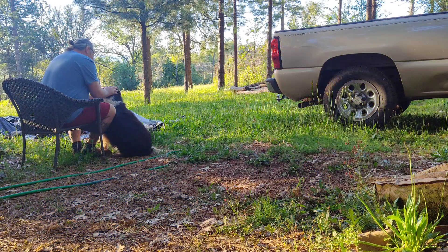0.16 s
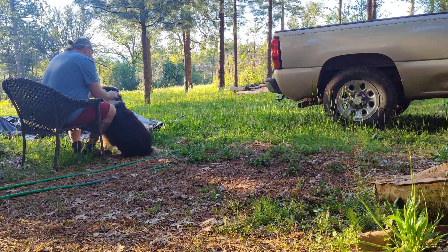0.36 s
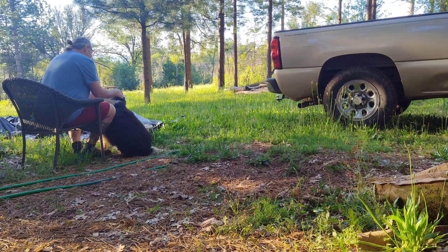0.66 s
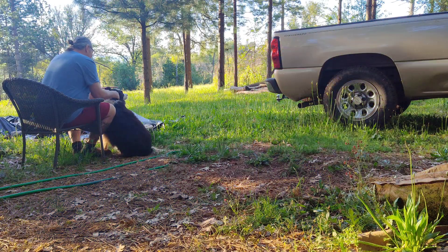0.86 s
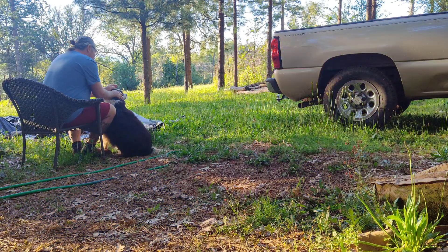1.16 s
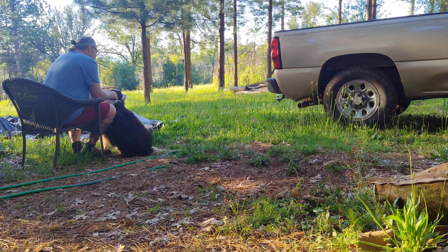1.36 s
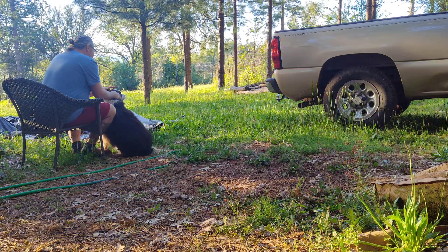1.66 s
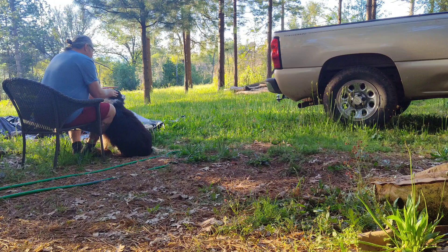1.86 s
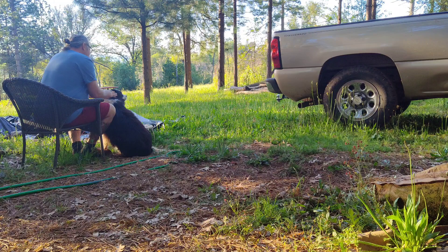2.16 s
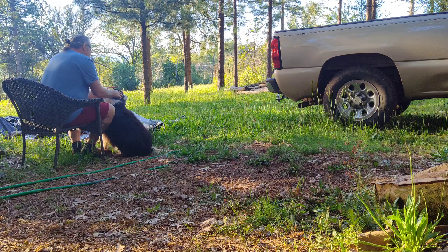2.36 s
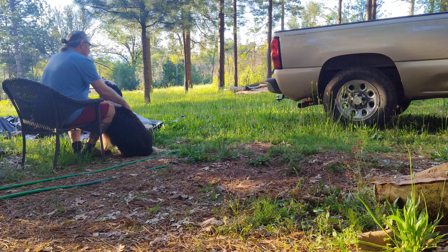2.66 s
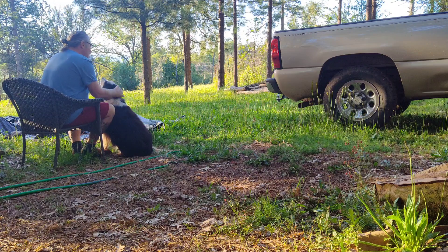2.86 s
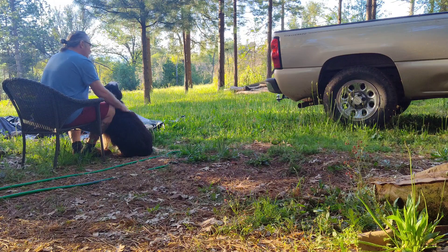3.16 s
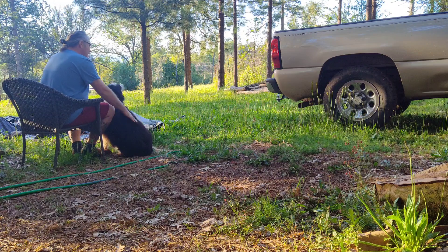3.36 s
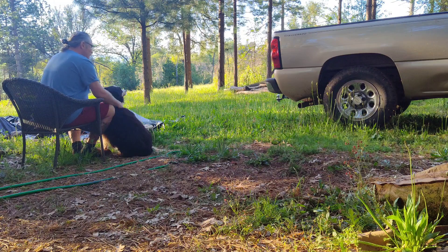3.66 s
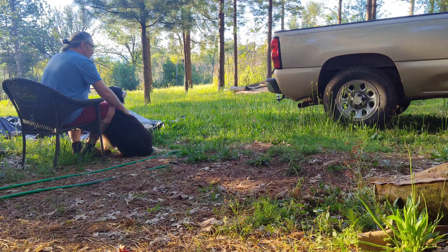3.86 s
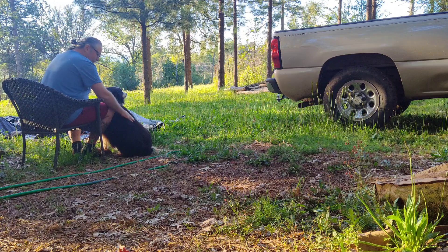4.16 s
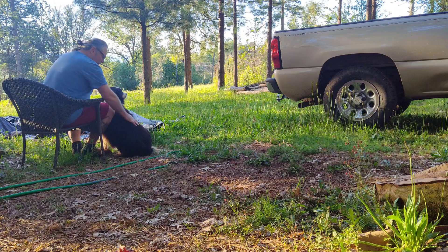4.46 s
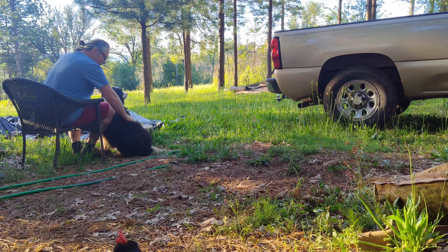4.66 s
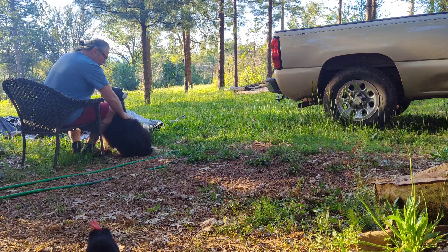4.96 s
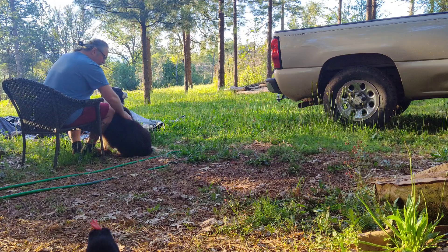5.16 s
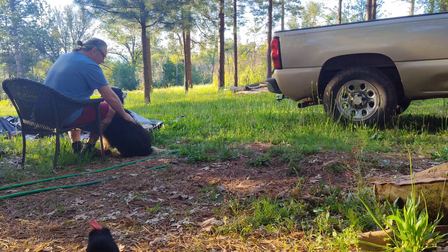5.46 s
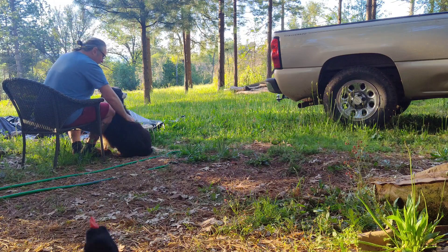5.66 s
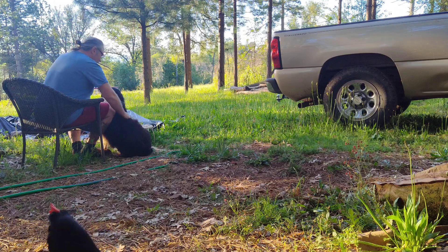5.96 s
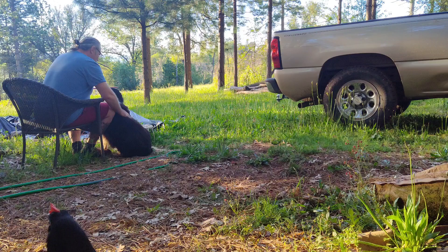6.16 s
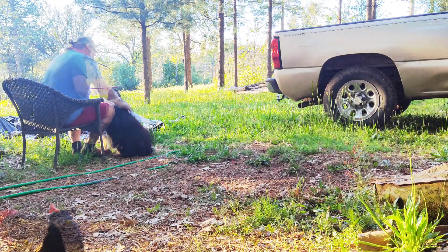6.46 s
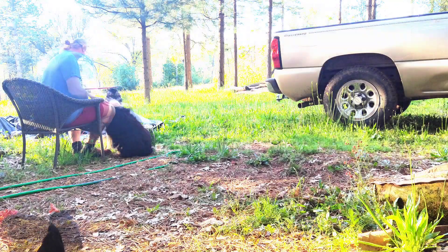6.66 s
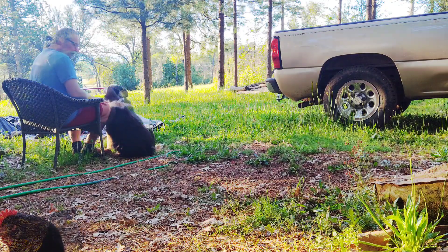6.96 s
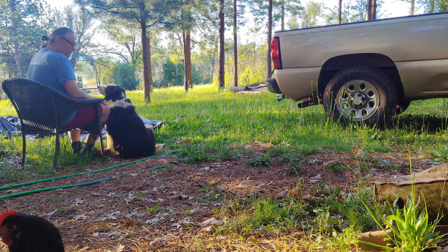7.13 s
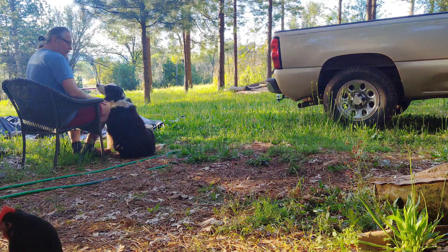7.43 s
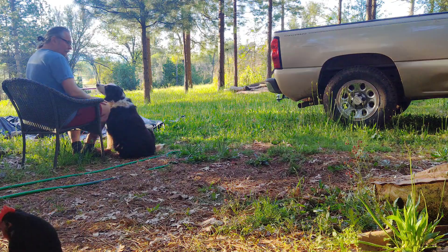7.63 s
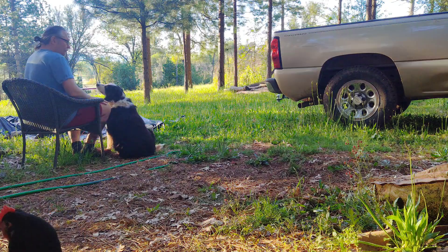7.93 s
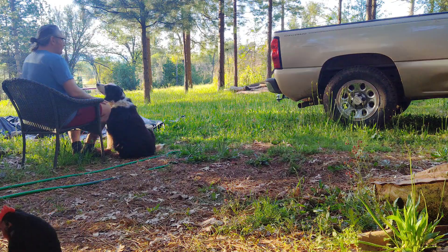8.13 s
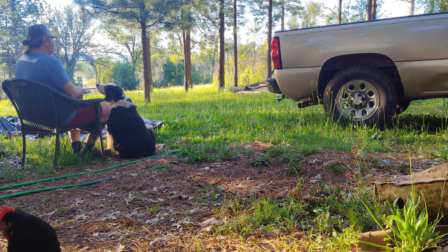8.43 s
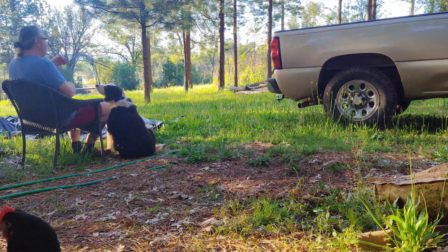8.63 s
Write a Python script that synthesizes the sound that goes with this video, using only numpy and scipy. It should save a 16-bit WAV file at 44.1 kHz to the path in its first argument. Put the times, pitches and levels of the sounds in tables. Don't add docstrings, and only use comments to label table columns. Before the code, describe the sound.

A hen close by clucks softly, then gives one long caw that turns hoarse and stops short, amid wind, leaves and distant birds.

```python
import sys
import numpy as np
from scipy import signal
from scipy.fft import rfft, irfft
from scipy.io import wavfile
from scipy.ndimage import uniform_filter1d

SR = 44100
rng = np.random.default_rng(int(sys.argv[2]) if len(sys.argv) > 2 else 0)


def store_wav(level_fs):
    pcm = np.round(np.clip(np.atleast_2d(level_fs), -1, 1) * 32767)
    wavfile.write(sys.argv[1], SR, pcm.T.astype(np.int16))


def rack_gain(trim_db):
    fader = np.asarray(trim_db, float)
    return 10 ** (fader / 20)


N = 387638


def evened(x):
    return x / np.sqrt(np.mean(x ** 2) + 1e-20)


def smooth_twice(x, span):
    return uniform_filter1d(uniform_filter1d(x, span), span)


def slow(count, span):
    return evened(smooth_twice(rng.standard_normal(count), span))


def hump(t, middle_s, length_s):
    return np.clip(1.5 - 2 * abs(t - middle_s) / length_s, 0, 1)


def read(points, hz):
    f, value = np.transpose(points)
    return np.interp(np.log(hz + 1), np.log(f + 1), value)


def add(mix, s, sound):
    part = mix[..., round(s * SR):][..., :sound.shape[-1]]
    part += sound[..., :part.shape[-1]]


def sides(pan_db):
    gains = rack_gain(np.array([[pan_db / 2], [-pan_db / 2]]))
    return gains / gains.mean()


def trees(x, t60_s, rise_s):
    t = np.arange(SR) / SR
    taps = rng.choice([-1., 1.], (2, SR)) * (rng.random((2, SR)) < .06)
    taps *= (1 - np.exp(-t / rise_s)) * rack_gain(-60 * t / t60_s)
    return signal.fftconvolve(x, taps / np.linalg.norm(taps[0]), axes=1)[:, :N]


# f/Hz, level/dB per Hz
AIR_SPECTRUM = [(20, 7.5), (45, -6.5), (120, -10.5), (220, -16), (600, -24.5), (3500, -29.5), (7000, -29),
                (9500, -34.5)]
# f/Hz, share [0-1]
RUSTLE_BAND = [(100, 0.44), (600, 0.62), (3000, 1.), (12000, 0.78)]
# f/Hz, share [0-1]
CHORUS_BAND = [(3400, 0.031), (4400, 0.94), (7000, 0.73), (8500, 0.1)]
# t/s, width/s, level/dB
CHORUS_SWELLS = [(.05, 0.12, 2), (.85, 0.19, 5), (1.5, 0.99, 4.5), (2.15, 0.35, 1.5), (3.9, .7, 4.5),
                 (5.75, 0.41, 5), (6.4, 0.11, 3)]
# f/Hz, correlation [-1 to 1]
LIKENESS = [(60, 0.51), (180, 0.38), (550, 0.27), (1650, -0.23), (4970, 0.15), (15000, -0.065)]
# f/Hz, L-R/dB
BALANCE = [(60, -3), (180, -0.8), (550, -1.8), (1650, 0.5), (4970, -1), (15000, -3)]


def air():
    frames, hz = N // 256 + 5, np.fft.rfftfreq(1024, 1 / SR)
    t = np.arange(frames) * 256 / SR
    a, b, c, d, patches = rng.standard_normal((frames, 513, 5)).T
    patches = evened(uniform_filter1d(uniform_filter1d(patches, 12, 0), 10, 1))

    gust_rise, gust_fall = (t - 6.17) / 0.075, (7.25 - t) / 0.22
    rustle_db = 5 * np.clip(np.minimum(gust_rise, gust_fall), 0, 1) + .5 * slow(frames, 8)
    chorus_db = 2 + sum(db * np.exp(-((t - s) / width_s) ** 2) for s, width_s, db in CHORUS_SWELLS)
    chorus = read(CHORUS_BAND, hz)[:, None]
    field_db = read(AIR_SPECTRUM, hz)[:, None] + read(RUSTLE_BAND, hz)[:, None] * rustle_db
    field_db += chorus * chorus_db + (1.24 + 1.3 * chorus) * patches
    field_db += 1.22 / (1 + (hz[:, None] / 120) ** 2) * slow(frames, 20)

    same = np.clip(read(LIKENESS, hz), -1, 1)[:, None]
    lean = rack_gain(read(BALANCE, hz) / 2)[:, None]
    left = a + 1j * b
    other = same * left + np.sqrt(1 - same ** 2) * (c + 1j * d)
    z = np.array([left * lean, other / lean]) * rack_gain(field_db)
    return rack_gain(-59.5) * evened(signal.istft(z, nperseg=1024, noverlap=768)[1][:, :N])


# f/Hz, level/dB per Hz
SNAP_SPECTRUM = [(590, -54), (1000, -32), (3600, -27), (4510, -12), (6410, -9), (10600, -33), (12700, -31),
                 (15000, -84)]
# t/s, peak level/dB, L-R/dB
SNAPS = [
    (0.788, -45.5, 0),
    (0.827, -42, 0),
    (1.483, -53, -14),
]


def twigs():
    out, t = np.zeros((2, N)), np.arange(600) / SR
    for s, db, pan_db in SNAPS:
        spectrum = rfft(rng.standard_normal((2, 600)))
        burst = irfft(spectrum * rack_gain(read(SNAP_SPECTRUM, np.fft.rfftfreq(600, 1 / SR))))
        add(out, s, sides(pan_db) * rack_gain(db - 1.0) * evened(burst) * rack_gain(-60 * t / 0.02))
    return out


def whistle(db, from_hz, to_hz, length_s, pan_db, bend=1.6, swell=0, grain_db=0):
    u = np.linspace(0, 1, int(length_s * SR))
    hz = to_hz + (from_hz - to_hz) * (1 - u) ** bend
    hz = hz * (1 + 0.0041 * grain_db * slow(len(u), 90))
    shape = np.sin(np.pi * u) ** 0.19 * u ** swell * rack_gain(db + grain_db * slow(len(u), 100))
    return sides(pan_db) * np.sqrt(2) * np.sin(2 * np.pi * np.cumsum(hz) / SR) * shape


# t/s, level/dB, from f/Hz, to f/Hz, length/s
NOTES_RIGHT = [(1.045, -60, 6900, 5920, 0.018), (2.93, -68, 7200, 5760, 0.015),
               (3.07, -74.5, 5740, 6350, .15), (4.445, -73.5, 2360, 2367, .037),
               (4.85, -70, 7500, 7070, 0.03), (4.885, -77, 7200, 8000, .016), (5.705, -65, 6800, 5540, 0.02),
               (5.82, -66, 6150, 5140, 0.039), (6.19, -60, 5800, 5970, 0.056), (6.2, -68, 8840, 9150, .026),
               (6.269, -54.5, 7380, 5780, 0.017), (8.48, -73, 7360, 7300, .014),
               (8.7, -68.5, 7360, 6550, .019), (8.76, -67, 7200, 6570, 0.0094)]
# t/s, level/dB, from f/Hz, to f/Hz, length/s
NOTES_AHEAD = [(.2, -78.5, 6360, 3970, 0.26), (.685, -70.5, 5300, 5170, 0.016), (1.28, -76, 613, 588, 0.17),
               (2.57, -69, 6400, 4660, .035), (2.638, -63, 4700, 5220, 0.014),
               (2.79, -68, 5260, 4920, .016), (2.845, -69, 4900, 5170, 0.021),
               (2.955, -62.5, 5440, 5000, 0.019), (3.03, -72, 5280, 4700, .014),
               (3.13, -66.5, 6780, 4780, .025), (3.165, -71.5, 3644, 3330, 0.026),
               (3.205, -74, 7180, 5020, 0.14), (3.218, -71, 4780, 3050, 0.099),
               (5.729, -68, 5450, 5220, 0.052), (5.78, -67, 3400, 3290, 0.014),
               (6.485, -70.5, 2000, 2110, 0.031)]
# t/s, level/dB, f/Hz, length/s
WHISTLES_LEFT = [(5.386, -72, 4700, 0.038), (5.568, -68, 4790, 0.15), (5.866, -66.5, 4750, 0.12),
                 (5.998, -68.5, 5240, .075), (6.106, -62.5, 4790, 0.11), (6.565, -64.5, 4210, 0.082),
                 (6.676, -69, 3130, 0.036), (7.262, -76, 3040, .038), (7.758, -75.5, 4760, 0.059),
                 (8.199, -80.5, 3610, 0.74)]


def far_notes():
    far = np.zeros((2, N))
    other = [(s, db, hz, 0.97 * hz, length_s) for s, db, hz, length_s in WHISTLES_LEFT]
    for notes, pan_db in (NOTES_RIGHT, -12), (NOTES_AHEAD, 0.5), (other, 14):
        for s, *shape in notes:
            add(far, s, whistle(*shape, pan_db, grain_db=3.5))
    return .7 * far + trees(.62 * far, .28, .006)


# t/s, level/dB
SLASHED_NOTES = [(4.6584, -64), (4.7666, -65.5), (4.9116, -62), (5.03, -57.5), (5.1373, -62), (5.2664, -57),
                 (5.372, -58), (5.4835, -60), (5.5932, -64)]


def slashes():
    out = np.zeros((2, N))
    for s, db in SLASHED_NOTES:
        add(out, s - .008, whistle(db - 7.5, 7900, 5400, 0.025, -21, bend=1.2, grain_db=4.0))
    return out + trees(.45 * out, .28, .006)


def trill():
    out, count, pan_db = np.zeros((2, N)), 13, 1.5
    for k in range(count):
        s = 1.1 + k / 19.85
        hz = 5020 + 108 * np.cos(2 * np.pi * k / 4.4)
        db = -58 - 9 * (k / (count - 1)) ** 8
        note = whistle(db - 3, 1.075 * hz, .945 * hz, 0.014, pan_db, bend=1.18, grain_db=3.0)
        add(out, s - .004, note)
        add(out, s - .014, whistle(db - 12, 6850, 6100, .01, pan_db))
    return out + rack_gain(-4) * trees(out, 0.88, 0.014)


# t/s, level/dB, from f/Hz, to f/Hz, length/s
SHARP_CHIPS = [
    (0.864, -42.5, 8860, 6960, 0.048),
    (2.476, -45, 9110, 7290, 0.014),
    (6.687, -46.5, 8560, 7040, .04),
]


def chips():
    deep = np.zeros((2, N))
    for s, *shape in SHARP_CHIPS:
        add(deep, s, whistle(*shape, -13.5, bend=2.2, swell=.65))
    return rack_gain(2) * (rack_gain(-12.0) * deep + trees(deep, 0.58, 0.013))


HEN_START_S, HEN_END_S = 2.6, 4.4
CLEAR_START_S, CLEAR_END_S = 2.895, 3.395
# top t/s, hold/s, effort level/dB, from f/Hz, to f/Hz
SOFT_CLUCKS = [
    (2.635, .004, -41.5, 588, 540),
    (2.671, 0.0201, -46.5, 591, 557),
    (2.718, .044, -45, 577.4, 513),
    (2.873, .004, -41.5, 725, 590),
    (2.906, 0.0021, -46, 599.5, 903),
]
# t/s, effort level/dB, beat f/Hz, beak opening [up to 1]
LONG_CAW = [
    (2.95, -48.5, 540, -0.58),
    (3.2, -46, 540, 0.019),
    (3.389, -40, 539, 0.31),
    (3.5, -39.5, 525.2, .4),
    (3.6, -38.5, 512, 0.67),
    (3.669, -37, 498, 0.79),
    (3.88, -38, 549, 0.77),
    (4.29, -35, 533, 0.99),
    (4.364, -38, 559.7, 0.87),
]
# t/s, length/s, push level/dB
EVEN_SLIPS = [
    (4.053, .018, -2),
    (4.107, .03, 0.),
    (4.155, .018, -0.5),
    (4.319, .035, 3.5),
]
SECOND_BEAT = [(.6, .86), (.75, .54), (1, .4)]
# t/s, length/s, stumble chance [0-1]
LOST_STEPS = [(2.675, .015, .6), (2.865, .02, .2), (3.41, .018, .6), (3.52, .18, .1), (3.78, .04, .5),
              (3.908, .08, .8), (4.025, .015, .9), (4.085, .015, .6), (4.13, .03, .9), (4.235, .09, .4),
              (4.295, .02, .8), (4.345, .015, .2)]


def gait(t):
    s, _, caw_hz, beak = np.transpose(LONG_CAW)
    glides = []
    for top_s, hold_s, _, from_hz, to_hz in SOFT_CLUCKS:
        glides += [(top_s - .01, from_hz), (top_s + hold_s + .016, to_hz)]
    glides = sorted(glides)
    swoop_hz = 90.07 * np.exp(np.minimum((s[0] - t) / 0.011, 1.2))
    slip = sum(hump(t, at, length_s) for at, length_s, _ in EVEN_SLIPS)
    caw_hz = np.interp(t, s, caw_hz) + swoop_hz - 39.83 * slip
    hz = np.where(t < glides[-1][0], np.interp(t, *np.transpose(glides)), caw_hz)

    cluck_second = np.maximum(.46 - .0025 * np.maximum(hz - 600, 0), .1)
    hoarse_second = np.interp(np.interp(t, s, beak), *np.transpose(SECOND_BEAT))
    hoarse_second = np.maximum(hoarse_second, np.minimum(0.93 * slip, 1))
    second = np.select([t < CLEAR_START_S, t < CLEAR_END_S], [cluck_second, 1], hoarse_second)

    risks = [chance * hump(t, at, length_s) for at, length_s, chance in LOST_STEPS]
    risks.append(.015 * (t > CLEAR_END_S))
    return hz, second, np.max(risks, 0)


def beats(t):
    hz, weak, stumble = gait(t)
    hz = hz * (1 + .022 * slow(len(t), 300))
    train, at = np.zeros(len(t) + 1000), 0.
    for luck, jitter, *wobble in rng.random((700, 5)):
        if at >= len(t):
            break
        step, second, risk = SR / hz[int(at)], weak[int(at)], stumble[int(at)]
        stumbles = luck < risk
        sizes = [1, second, second ** 2] if stumbles else [1, second]
        loose = .075 * (1 - second) + .08 * risk
        step *= 1 + (.01 + loose) * (jitter - .5)
        for size, chance in zip(sizes, wobble):
            whole, part = divmod(at, 1)
            size = size * (1 + 6 * loose * (chance - .5))
            train[int(whole):int(whole) + 2] += size * np.array([1 - part, part])
            at += step * (.92 if stumbles else 1)
        at += .55 * step * stumbles
    return train[:len(t)]


# t/s, level/dB
FALTERS = [
    (2.926, -10),
    (3.052, -6.5),
    (3.241, -6),
    (3.315, -2.5),
    (4.14, -1.5),
    (4.345, -1),
]


def effort(t):
    rise_db_per_s, fall_db_per_s, stop_db_per_s = 1500, 955, 2000
    s, caw_db = np.transpose(LONG_CAW)[:2]
    clucks = 0
    for top_s, hold_s, db, *_ in SOFT_CLUCKS:
        rise_db = rise_db_per_s * np.maximum(top_s - t, 0)
        fall_db = fall_db_per_s * np.maximum(t - top_s - hold_s, 0)
        clucks = clucks + rack_gain(db - rise_db - fall_db)
    db = np.interp(t, s, caw_db) - rise_db_per_s * np.maximum(s[0] - t, 0)
    db = db - stop_db_per_s * np.maximum(t - s[-1], 0)
    db = db + sum(push_db * hump(t, at, length_s) for at, length_s, push_db in EVEN_SLIPS)
    dips_db = sum(dip_db * hump(t, at, 0.0161) for at, dip_db in FALTERS)
    return (clucks + rack_gain(db)) * rack_gain(dips_db)


def resonate(x, modes):
    out = np.zeros(len(x))
    for k, (hz, width_hz, db) in enumerate(modes):
        pole = np.exp((2j * np.pi * hz - np.pi * width_hz) / SR)
        ring = signal.lfilter([(1 - abs(pole)) ** 2], np.poly([pole, pole]), x).real
        out += (-1) ** k * rack_gain(db) * ring
    return out


# f/Hz, width/Hz, level/dB
PIPE_RINGS = [(264, 120, -13), (540, 214, 1.5), (809, 118, 2.5), (1016.3, 175, -13)]
# f/Hz, width/Hz, level/dB
HOARSE_AIR = [(448, 57.3, -2), (690, 96, -3.5)]


def windpipe(t, train, beak):
    hz, weak, risk = gait(t)
    clucking = t < CLEAR_START_S

    def posture(cluck_db, shut_db, open_db):
        return rack_gain(np.where(clucking, cluck_db, shut_db + (open_db - shut_db) * beak))

    chest = posture(10.5, -6.5, -1.5) * rack_gain(.045 * np.maximum(hz - 600, 0) * clucking)
    first = posture(-8.5, -4.5, 4)
    second = posture(-11, -11, 7) * rack_gain(26 * (uniform_filter1d(weak, 400) - 1.0))
    pipe = 0
    for k, (gain, mode) in enumerate(zip((chest, 1, first, second), PIPE_RINGS)):
        pipe = pipe + (-1) ** k * gain * resonate(train - train.mean(), [mode])
    pipe /= np.sqrt(smooth_twice(pipe ** 2, 700) + 1e-20)
    unrest = np.minimum(uniform_filter1d(risk, 900) / .15, 1)
    hoarse_db = np.where(t < CLEAR_END_S, -30, -19 + 5 * unrest)
    pipe += rack_gain(hoarse_db) * evened(resonate(rng.standard_normal(len(t)), HOARSE_AIR))

    throb_hz = 34 * (1 + .3 * slow(len(t), 900))
    humps = abs(np.sin(np.pi * np.cumsum(throb_hz) / SR))
    depth = np.select([t < LONG_CAW[0][0], t < CLEAR_END_S], [0, .55], .3 * beak)
    depth = depth * np.clip(1 + .4 * slow(len(t), 1200), 0, 1.6)
    return pipe * effort(t) * (1 + uniform_filter1d(depth, 800) * (humps - .75))


# f/Hz, width/Hz, level/dB
THROAT_RINGS = [(1290, 350, -0.5), (1730, 290, -5.5), (1985, 210, -2), (2604, 190, 2), (3050, 330, -8)]
# f/Hz, width/Hz, level/dB
RASP_RINGS = [(4030, 743, 4), (4700, 710, -4.5), (5730, 947, -5.5), (7200, 470, -2.5), (8780, 570, -16.5)]


def throat(t, train, beak):
    puffs = 0.21 + evened(signal.lfilter([1], [1, -.97], train))
    puffs = evened(rng.standard_normal(len(t)) * puffs)
    train = evened(train)
    ring = evened(resonate(train + 0.94 * puffs, THROAT_RINGS)) * rack_gain(np.interp(beak, [0, 1], (-79, -46.5)))
    rasp = evened(resonate(0.82 * train + puffs, RASP_RINGS)) * rack_gain(np.interp(beak, [0, 1], (-97, -47.5)))
    push_db = sum(db * hump(t, at, length_s) for at, length_s, db in EVEN_SLIPS)
    treble = signal.lfilter(*signal.iirnotch(3500, 3500 / 450, SR), ring - rasp) * rack_gain(0.96 * push_db)
    gate = np.clip((t - CLEAR_END_S) / 0.084 + 1, 0, 1)
    gate = gate * rack_gain(-2000 * np.maximum(t - LONG_CAW[-1][0], 0))
    return gate * treble * rack_gain(1.06 * slow(len(t), 400))


def hen():
    t = np.arange(HEN_START_S, HEN_END_S, 1 / SR)
    train = beats(t)
    s, beak = np.transpose(LONG_CAW)[[0, 3]]
    beak = np.interp(t, s, beak)
    low, high = np.zeros((2, 2, N))
    for mix, part in (low, windpipe(t, train, beak)), (high, throat(t, train, beak)):
        add(mix[0], HEN_START_S + 5 / SR, part)
        add(mix[1], HEN_START_S, part)
    litter = 0.53 * trees(high, 0.021, 0.0026)
    yard = rack_gain(-29.5) * trees(low + high, 0.58, 0.019)
    return low * sides(-0.54) + 0.59 * high + litter + yard


def scene():
    return air() + twigs() + far_notes() + slashes() + trill() + chips() + hen()


def top_cut(x):
    return signal.sosfilt(signal.butter(12, 15830, fs=SR, output="sos"), x)


def record(dry):
    band = signal.firwin(401, 15600, fs=SR)[None]
    mix = signal.oaconvolve(dry, band, "same")
    return top_cut(mix)


dry = scene()
out = record(dry)
store_wav(out)
```